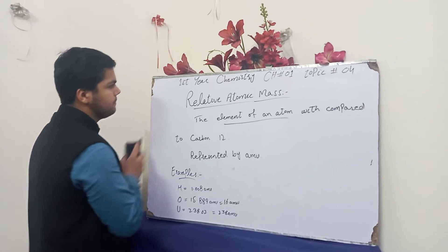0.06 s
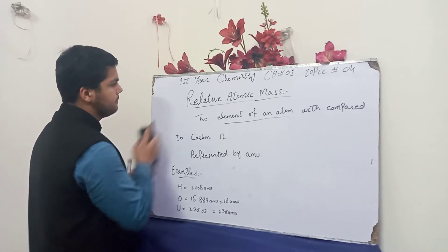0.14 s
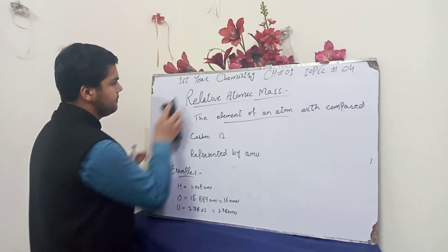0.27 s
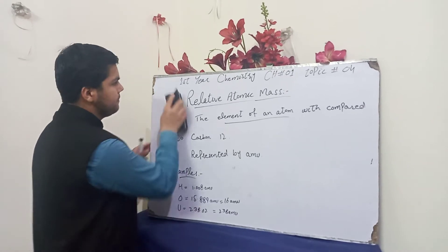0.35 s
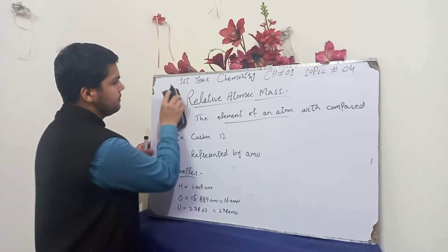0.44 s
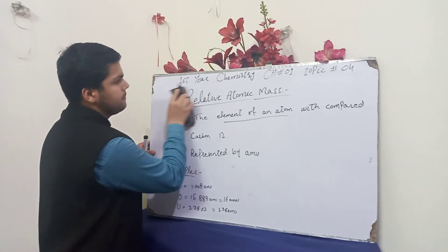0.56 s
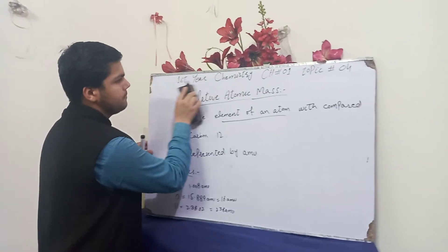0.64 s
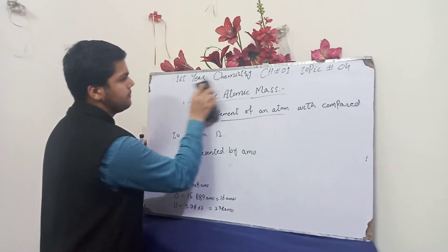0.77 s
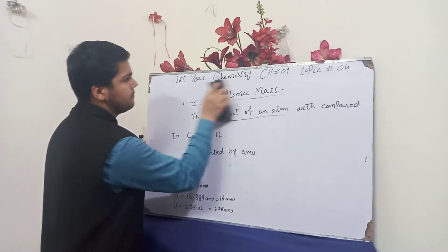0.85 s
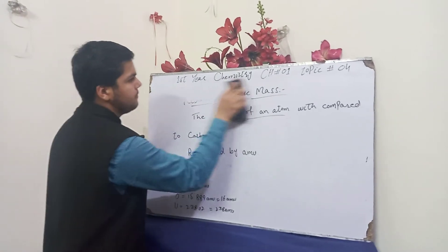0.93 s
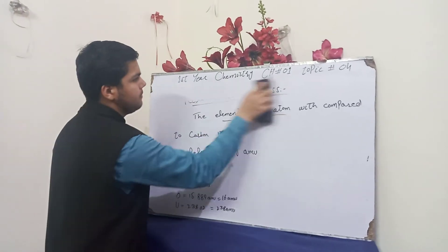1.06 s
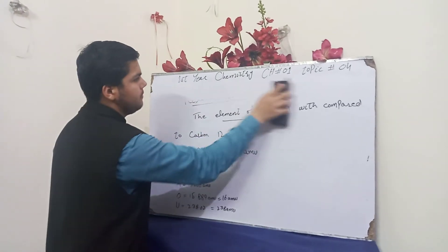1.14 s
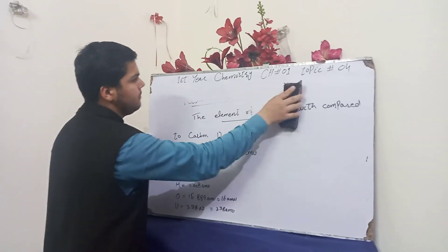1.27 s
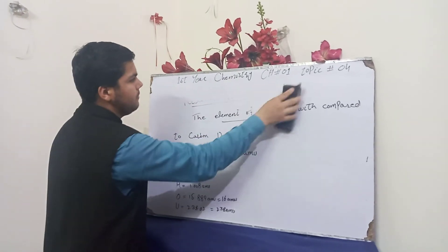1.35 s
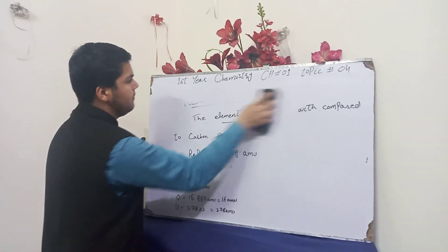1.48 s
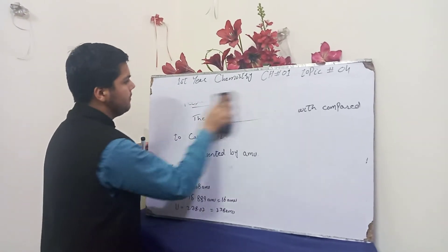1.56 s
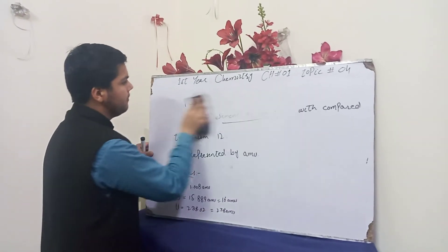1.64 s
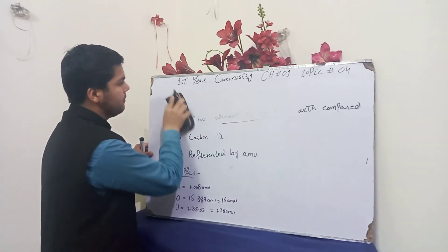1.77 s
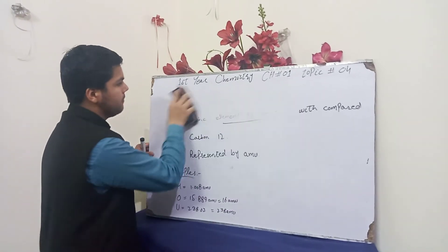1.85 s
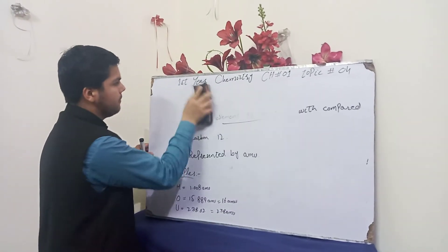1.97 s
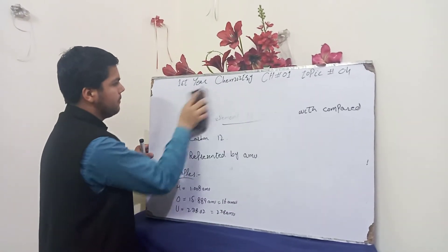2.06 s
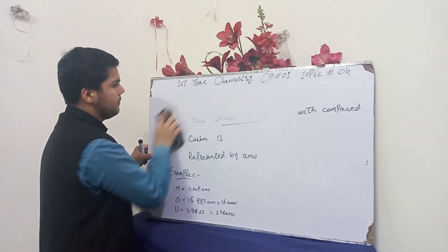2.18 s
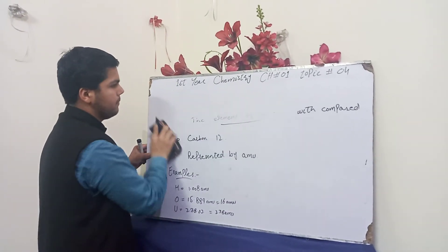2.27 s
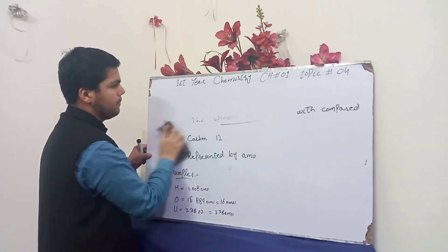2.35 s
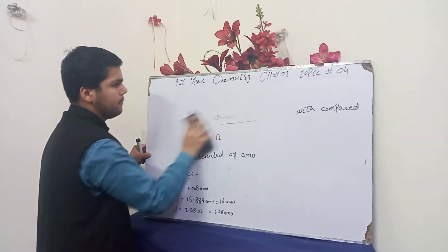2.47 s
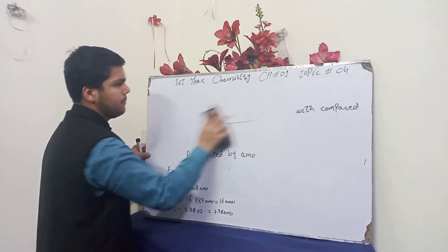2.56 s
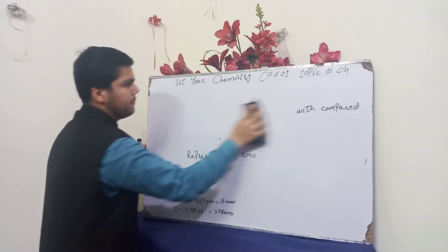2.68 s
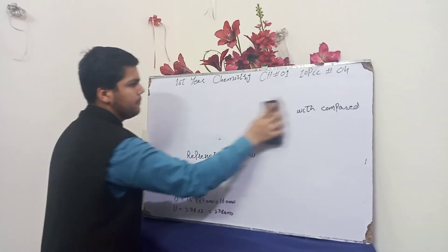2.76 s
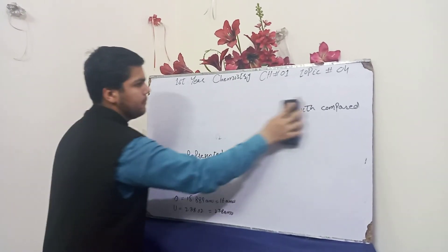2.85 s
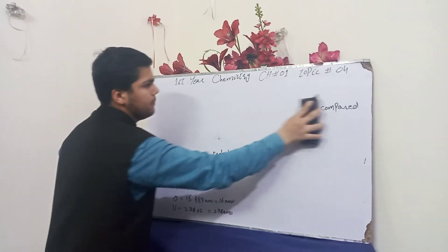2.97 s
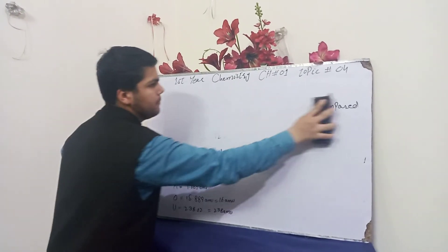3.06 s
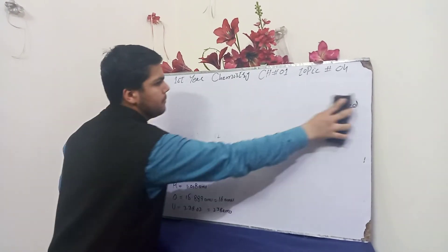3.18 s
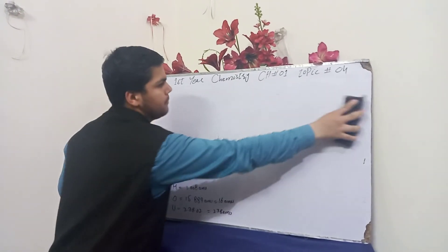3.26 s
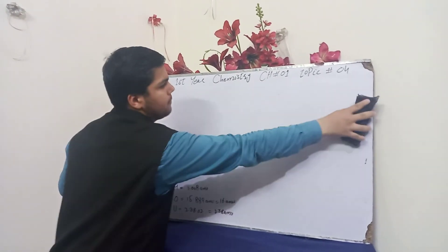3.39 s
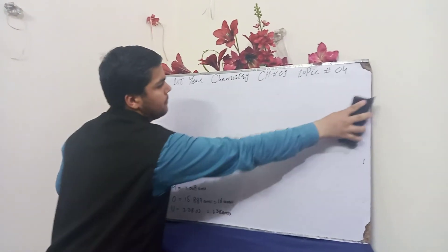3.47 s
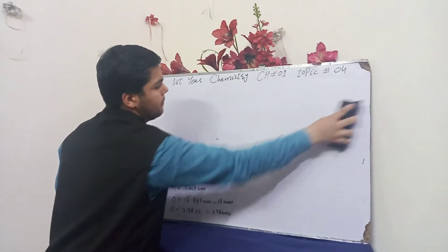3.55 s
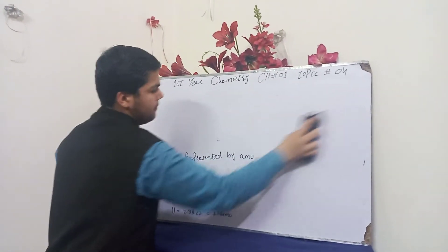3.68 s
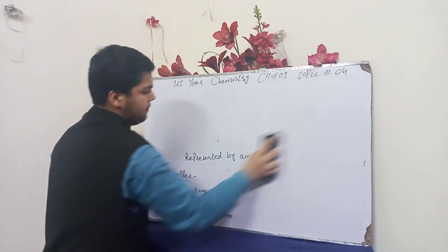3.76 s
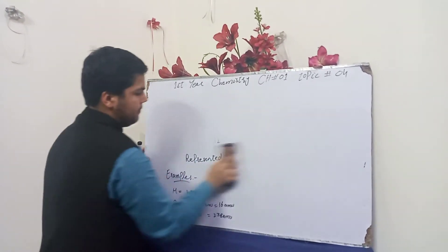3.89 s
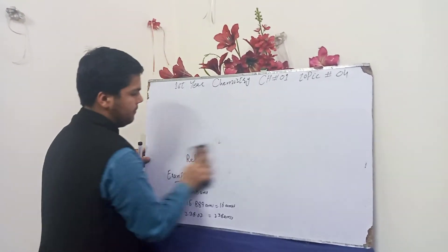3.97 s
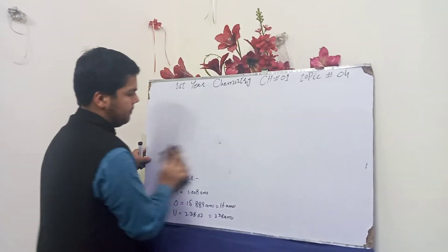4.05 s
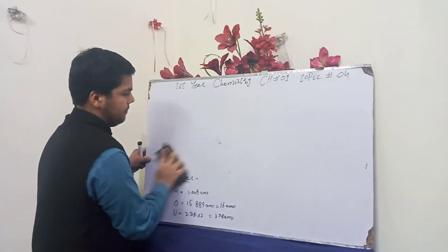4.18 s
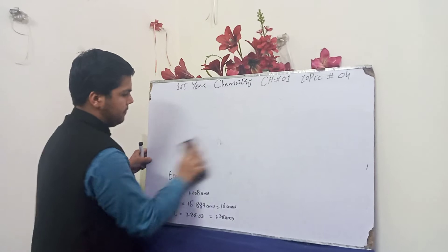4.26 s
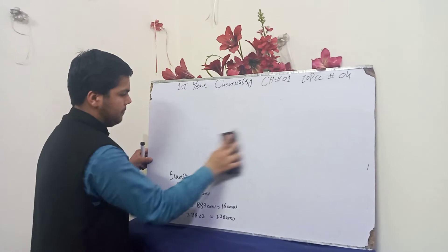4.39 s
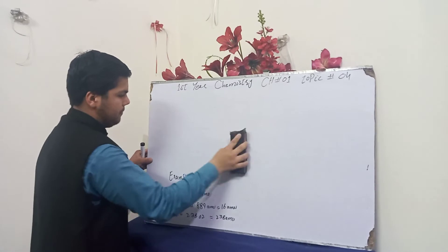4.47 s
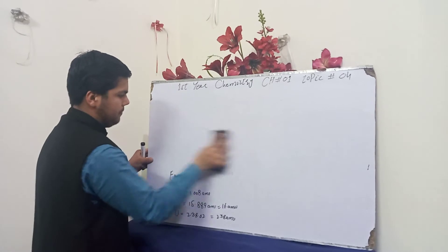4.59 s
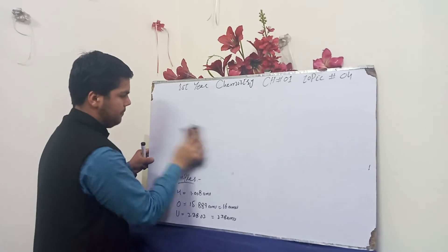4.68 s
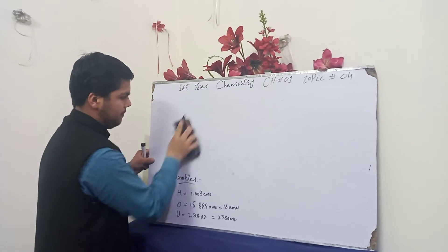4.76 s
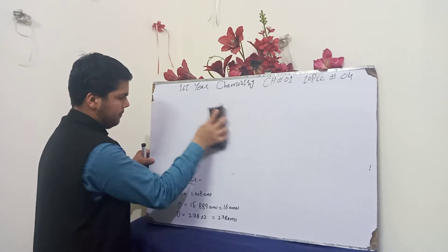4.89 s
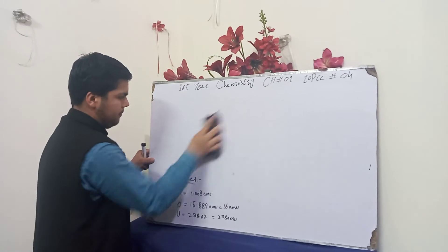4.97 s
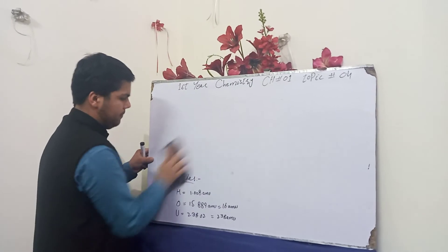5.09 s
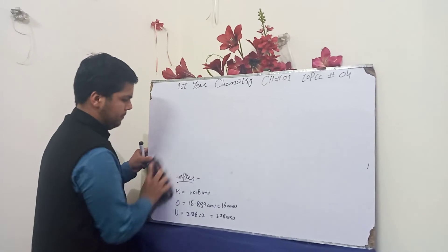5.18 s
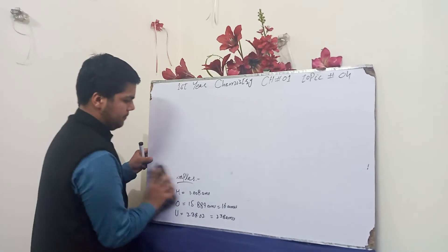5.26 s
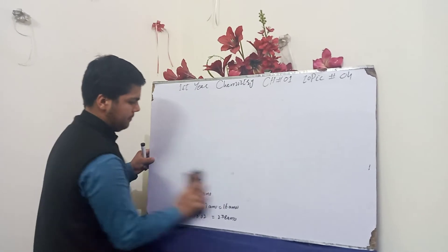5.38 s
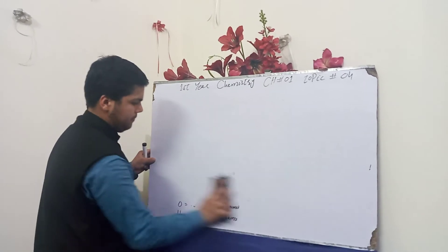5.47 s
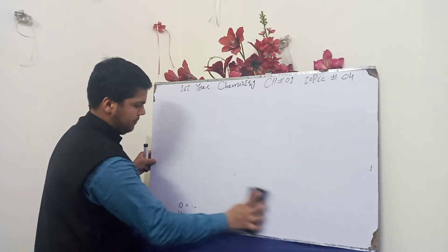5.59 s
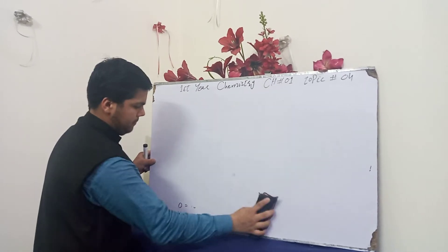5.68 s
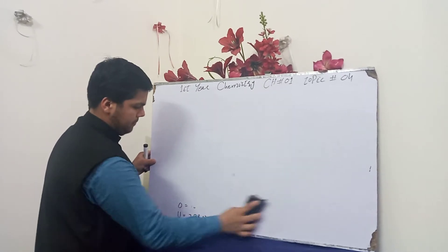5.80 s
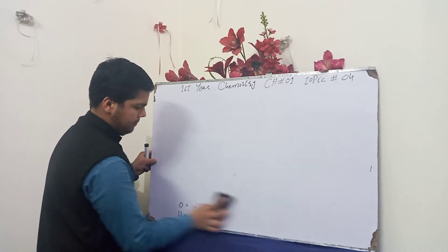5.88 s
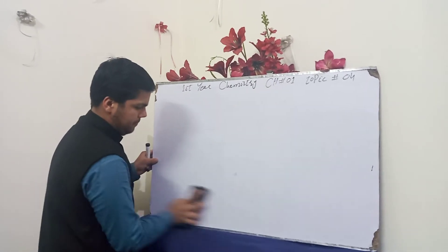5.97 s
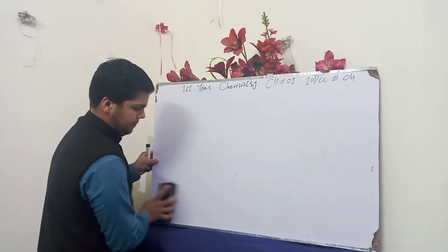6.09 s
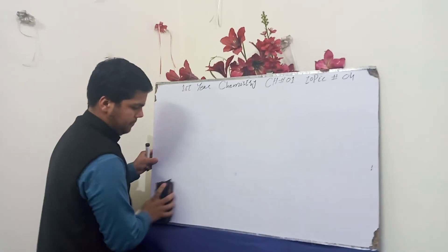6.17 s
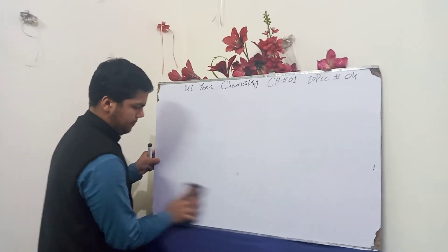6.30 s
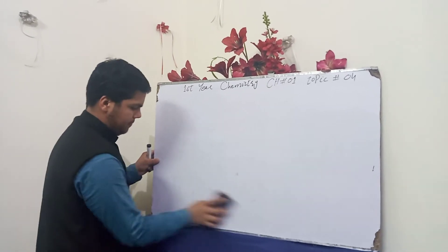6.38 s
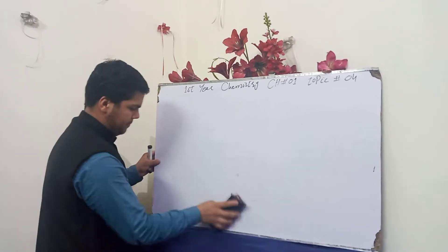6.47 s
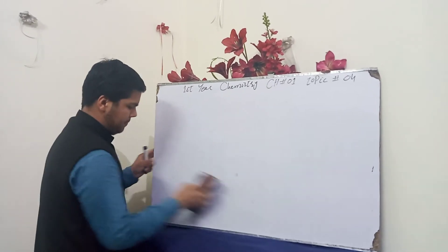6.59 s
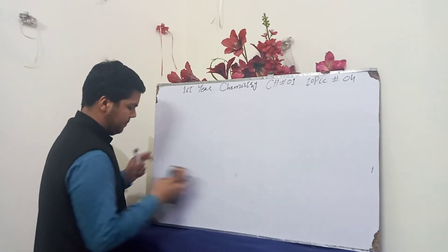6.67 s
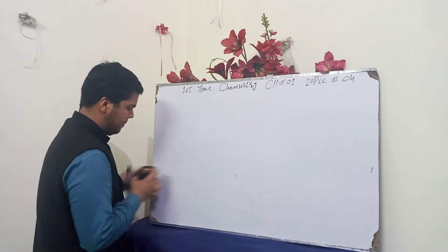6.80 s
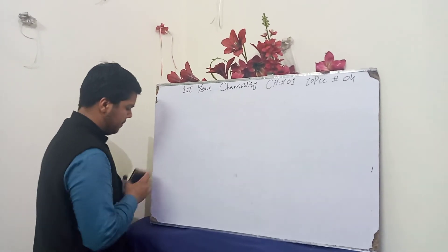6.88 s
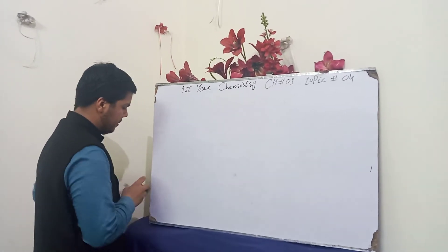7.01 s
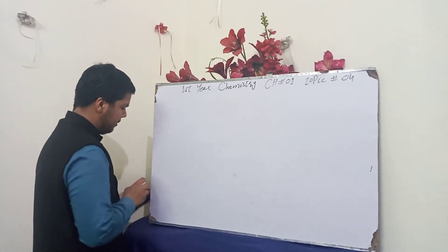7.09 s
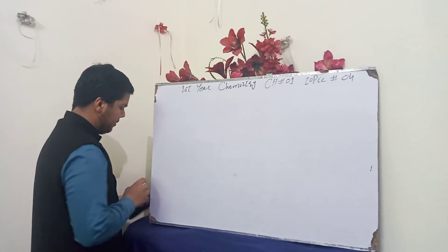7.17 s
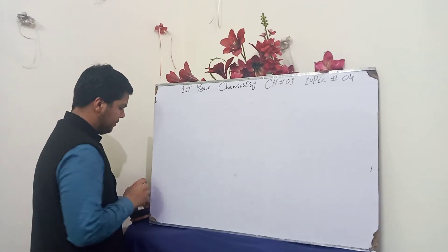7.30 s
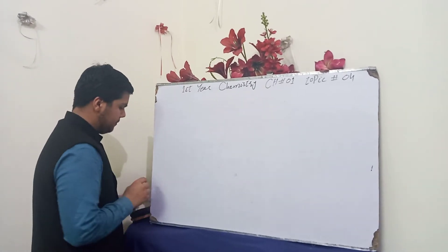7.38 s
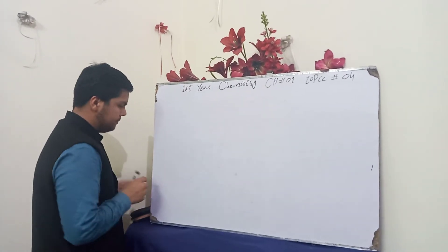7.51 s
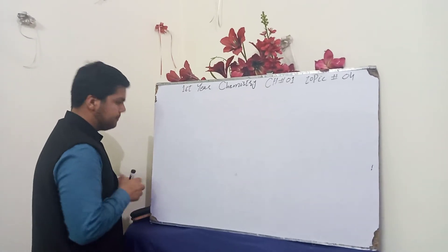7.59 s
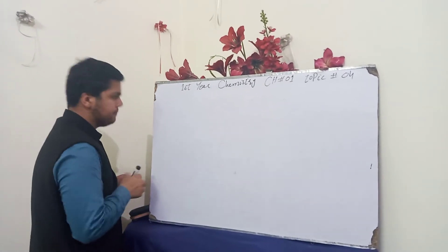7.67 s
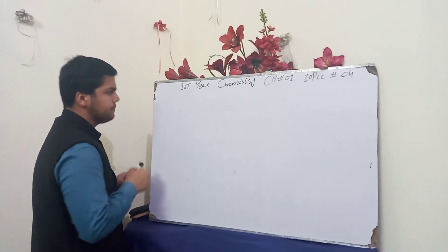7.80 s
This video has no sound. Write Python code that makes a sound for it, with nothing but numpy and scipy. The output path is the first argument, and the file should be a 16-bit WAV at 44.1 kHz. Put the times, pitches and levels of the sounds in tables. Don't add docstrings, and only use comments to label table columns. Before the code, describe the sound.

In a small bare room with a faint low rumble, sleeves rustle briefly, then a felt eraser swishes to and fro across a thin whiteboard for about six seconds, catching at some turns while the board softly bumps the wall. The wiping stops, cloth and fingers rustle, the eraser lands on a table with a short muffled boom, and a small sharp tick ends it. Close stereo microphones.

```python
import sys
import numpy as np
from scipy import signal
from scipy.fft import rfft, irfft, next_fast_len
from scipy.io import wavfile
from scipy.ndimage import uniform_filter1d, map_coordinates

SR = 44100
rng = np.random.default_rng(int(sys.argv[2]) if len(sys.argv) > 2 else 0)


def volts(x):
    e = np.asarray(x, float) / 20
    return 10 ** e


def unload_wav(signal):
    wavfile.write(
        sys.argv[1],
        SR,
        np.round(np.clip(np.atleast_2d(signal).T, -1, 1) * 32767).astype(np.int16),
    )


N = 345811

# pitch_hz, level_db (per Hz)
FELT = [(1350, -50.5), (2300, -11), (2700, -4), (3220, -1), (3690, -1.5), (5420, -3), (6500, 1.5),
        (8070, -9), (9000, -13), (11700, -34), (19800, -120)]
# pitch_hz, level_db (per Hz)
DUST = [(6000, -19), (8000, -20), (9500, -2), (13900, -9), (14500, 0.5), (15700, 2)]


def unit(x):
    return x / np.sqrt(np.mean(x ** 2) + 1e-20)


def along(points, hz):
    f, v = np.transpose(points)
    return np.interp(np.log(hz + 1), np.log(f + 1), v)


def curves(rows):
    s, *cols = np.transpose(rows)
    return [np.interp(np.arange(N) / SR, s, c) for c in cols]


def wobble(rate):
    knots = rng.standard_normal(int(N * rate / SR) + 4)
    return map_coordinates(knots, [np.arange(N) * rate / SR])


def ramps(events):
    t = np.arange(N) / SR
    power = 0
    for s, db, up, hold, down in events:
        before, after = np.clip(s - t, 0, None), np.clip(t - s - hold, 0, None)
        power = power + volts(db - up * before - down * after) ** 2
    return 10 * np.log10(power + 1e-14)


def filtered(x, response):
    m = next_fast_len(N + SR // 2)
    return irfft(rfft(x, m) * response(np.fft.rfftfreq(m, 1 / SR)), m)[..., :N]


def coloured(x, spectrum):
    return unit(filtered(x, lambda hz: volts(along(spectrum, hz))))


def resonance(hz, centre, width):
    return 1j * hz * width / (centre * centre - hz * hz + 1j * hz * width)


def resonant(x, modes):
    def ring(hz):
        return sum((-1) ** k * volts(db / 2) * resonance(hz, c, w) for k, (c, w, db) in enumerate(modes))
    return unit(filtered(x, lambda hz: ring(hz) ** 2))


def fibres(grit_db, clump_db, patchy_db):
    sizes = grit_db * rng.standard_normal(N) + clump_db * (wobble(180) + wobble(25))
    z = signal.stft(rng.standard_normal((3, N)), nperseg=1024)[2]
    field = uniform_filter1d(rng.standard_normal(z.shape), size=3, axis=1)
    field = uniform_filter1d(field, size=6, axis=2)
    slips = signal.istft(z * volts(patchy_db * unit(field)), nperseg=1024)[1][:, :N]
    slips[0] *= unit(volts(sizes))
    return slips


def reach_ms():
    # time_s, left_lag_ms (how much later the left microphone hears it)
    swing_ends = [(.3, 1.02), (.7, 1.005), (1.23, .83), (1.72, 1.005), (2.1, 1.02), (3.25, .797),
                  (3.4, .797), (4.12, 1.04), (4.4, .94), (4.68, 1.01), (4.87, .965), (5.18, 1.04),
                  (5.63, .915), (6.05, 1.025), (6.4, .96), (6.9, 1.07)]
    s, ms = np.transpose(swing_ends)
    place = np.interp(np.arange(N) / SR, s, np.arange(len(s)))
    eased = np.floor(place) + (1 - np.cos(np.pi * (place % 1))) / 2
    return np.interp(eased, np.arange(len(s)), ms)


def delayed(x):
    left = map_coordinates(x, [np.arange(N) - reach_ms() * SR / 1000], mode="nearest")
    return np.array([left, x])


def spread(tone, level_db, wet_db, t60):
    keep = volts(-120 / (t60 * SR))
    lingering = np.sqrt(signal.lfilter([1 - keep], [1, -keep], volts(level_db) ** 2))
    direct = delayed(volts(level_db) * tone[0])
    return (direct + volts(wet_db) * lingering * tone[1:]) / np.hypot(1, volts(wet_db))


def background(rubbing):
    # pitch_hz, level_db (per Hz)
    hum = [(15, -47), (25, -28.5), (91, -3.5), (134, 1.5), (160, -8.5), (199, -3), (387, -15), (405, -15),
           (800, -29), (1040, -28), (1760, -120)]
    # pitch_hz, level_db (per Hz)
    hiss = [(250, -8.5), (500, -7), (1000, -12.5), (1400, -11), (7100, -10.5), (9000, -13.5), (12300, -31),
            (14000, -28), (15000, -11)]
    lumps_db = 2.2 * wobble(7) + 2.2 * wobble(16)
    rumble = unit(volts(lumps_db) * coloured(rng.standard_normal((3, N)), hum))
    rumble = volts(-69) * (delayed(rumble[0]) + volts(-6) * rumble[1:])
    loudness = np.sqrt(np.abs(uniform_filter1d(rubbing ** 2, size=4000)))
    ducking = 1 / (1 + loudness / volts(-36.5))
    patches = fibres(grit_db=0, clump_db=0, patchy_db=3.0)[1:]
    return rumble + volts(-67) * ducking * coloured(patches, hiss)


def rustle_db(column):
    # time_s, level_db, slope_s (per 10 dB), dull_db, fine_db (both re level)
    rustles = [(0.0, -59.5, .16, -11, -14), (.13, -54.5, .05, -14, -16), (.2, -63, .08, -10, -20),
               (.27, -53, .06, -12, -9), (.345, -51, .04, -8, -12), (.44, -61, .05, -7, -20),
               (.31, -56, .04, -8, -12), (6.48, -57, .12, -20, -12), (6.57, -61.5, .08, -28, -14),
               (6.67, -59, .04, -22, -9), (6.9, -51, .028, -11, -16), (7.01, -60.5, .07, -6, -25),
               (7.11, -65.5, .1, -13, -20), (7.175, -64, .03, -19, -16), (7.29, -59, .04, -14, -7),
               (7.335, -61, .01, -14, -12), (7.475, -76, .04, 4, -8), (7.57, -76, .04, -15, 6)]
    # time_s, level_db, fading_s (per 10 dB), dull_db, fine_db (both re level)
    touches = [(6.634, -55.5, .035, -30, -8), (6.737, -55, .14, -15, -8), (6.857, -46, .022, -30, -5),
               (7.234, -54.5, .045, -18, -8), (7.678, -66, .016, -20, 6)]
    rise_s = .012
    swells = [(row[0], row[1] + column(row), 10 / row[2], 0, 10 / row[2]) for row in rustles]
    contacts = [(row[0], row[1] + column(row), 10 / rise_s, 0, 10 / row[2]) for row in touches]
    return ramps(swells + contacts)


def sleeves():
    # pitch_hz, level_db (per Hz)
    cloth = [(1470, -43), (2500, -9.5), (3080, -8.5), (3580, -3), (6630, -1), (9000, -10.5), (11700, -34),
             (19800, -120)]
    level_db = rustle_db(lambda row: 0)
    dull_db = rustle_db(lambda row: row[3]) - level_db
    fine_db = rustle_db(lambda row: row[4]) - level_db
    slips = fibres(grit_db=2.0, clump_db=1.6, patchy_db=3)
    tone = coloured(slips, cloth) + volts(fine_db + 3) * coloured(slips, DUST)
    tone += volts(dull_db - 3.0) * resonant(slips, [(1005, 110, -0.5), (1450, 270, -3), (2050, 500, 1.5)])
    return spread(tone, level_db + 2.5, wet_db=1.5, t60=.12)


def strokes():
    # time_s, speed_db (as felt hiss), flat_db (felt flatness as skin re hiss)
    sweep = [(.52, -45.5, -13), (.8, -41, -13), (1.08, -38, -12.5), (1.36, -40.5, -9.5),
             (1.57, -36.5, -7.5), (1.85, -40, -11.5), (2.12, -41.5, -10.5), (2.6, -36.5, -12.5),
             (3.0, -38, -8.5), (3.5, -40.5, -12), (3.97, -36.8, -7), (4.3, -37, -12.5), (4.6, -37.5, -8.5),
             (5.2, -38.5, -11.5), (5.42, -33.3, -5.5), (5.77, -43, -11), (6.02, -40, -10.5),
             (6.3, -40.8, -9)]
    # time_s, dip_db, slowing_s, pick_up_s, catch_db
    turns = [(1.23, 12.5, .055, .05, 0), (1.745, 4, .06, .02, 6.5), (1.935, 5.5, .035, .025, 1),
             (2.215, 5.5, .018, .015, 1), (3.35, 13.5, .05, .07, 0), (3.415, 5, .03, .04, 0),
             (4.08, 8, .035, .015, 4), (4.418, 10, .025, .06, 10), (4.655, 5.5, .025, .012, 3.5),
             (4.855, 4.5, .04, .1, 5), (5.165, 6, .03, .03, 0), (5.63, 9.5, .05, .045, 0),
             (5.86, 0.5, .02, .03, 2.5), (6.1, 9, .025, .035, 0)]
    # time_s, board_db (re felt), hold_s, easing_db_per_s
    presses = [(.42, -19, .08, 250), (1.2, -23, .05, 100), (1.31, -16, .08, 50), (1.5, -14, .33, 130),
               (1.95, -21, .02, 100), (2.26, -15, .03, 130), (2.55, -34, .2, 80), (3.5, -21, .1, 65),
               (4.12, -14, .02, 140), (4.47, -22, .02, 120), (4.69, -21, .1, 60), (4.88, -16, .06, 90),
               (5.22, -19, .03, 90), (5.42, -27, .1, 120), (5.7, -19, .01, 120), (5.92, -13, .01, 170),
               (6.19, -17, .03, 90), (6.4, -24, .05, 100)]
    touch_s, settle_s, lift_s, lift_db_per_s = .36, .04, 6.33, 125
    catch_after_s, catch_s = .04, .015
    lean_db_per_s, light_db = 350, -42
    t = np.arange(N) / SR

    slowing = lift_db_per_s * np.clip(t - lift_s, 0, None)
    catches = 0
    for s, dip_db, slow, fast, catch_db in turns:
        slowing += dip_db * np.exp(-np.abs(t - s) / np.where(t < s, slow, fast))
        catches = catches + catch_db * np.exp(-((t - s - catch_after_s) / catch_s) ** 2)
    speed_db, flat_db = curves([(touch_s, -84, -11), (touch_s + settle_s, -57, -11)] + sweep)
    felt_db = speed_db - slowing + catches
    panel_db = flat_db - .4 * slowing - .5 * catches + wobble(14)

    leans = [(s, db, lean_db_per_s, hold, ease) for s, db, hold, ease in presses]
    board_db = ramps([(0, light_db, 0, 0, 0)] + leans) - catches + 2.2 * wobble(25)

    reach = reach_ms()
    returning = np.clip(uniform_filter1d(np.gradient(reach) * SR, size=4000) / .35, 0, 1)
    dust_db = -8.7 + 25 * (reach - 1) + 5 * returning * (1.05 - reach) / .2
    dust_db = dust_db - .7 * slowing + 1.3 * wobble(14)
    return felt_db, panel_db, board_db, dust_db


def eraser():
    # pitch_hz, width_hz, level_db
    panel = [(1570, 547, -2), (2124, 790, 3)]
    # pitch_hz, width_hz, level_db
    board = [(919, 109, 3.5), (1163, 750, -3)]
    # pitch_hz, width_hz, level_db
    sag = [(817, 108, 0)]
    felt_db, panel_db, board_db, dust_db = strokes()
    slips = fibres(grit_db=1.84, clump_db=1.04, patchy_db=2.5)
    absorbed = volts([[0], [-3], [-3]])
    tone = coloured(slips, FELT) + volts(dust_db + 3.7) * coloured(absorbed * slips, DUST)
    tone += volts(panel_db - 1.4) * resonant(slips, panel)
    tone += volts(board_db - 1.5) * resonant(slips, board)
    tone -= volts(1.55 * board_db - 4.5) * resonant(slips, sag)
    return spread(tone, felt_db + 2.0, wet_db=0.55, t60=0.093)


def bumps():
    # time_s, peak_db, pitch_hz, t60_s
    thuds = [(0.366, -47.5, 91.5, 0.12), (0.702, -56, 138.6, 0.17), (1.736, -43, 146, 0.091),
             (2.3, -65, 127, 0.072), (3.167, -54.5, 133, 0.087), (3.787, -55, 130, 0.11),
             (4.407, -55, 134, 0.13), (4.804, -63, 96.9, 0.12), (5.342, -58, 103, 0.12),
             (5.588, -62, 123, 0.23), (6.455, -63, 330, 0.15), (6.745, -56, 130, 0.11),
             (7.09, -57, 130, 0.12), (7.152, -51, 127, 0.1), (7.519, -50.5, 107, 0.086),
             (7.686, -54.5, 124, 0.11)]
    out, t = np.zeros(N + SR), np.arange(SR // 3) / SR
    for s, db, hz, t60 in thuds:
        swell = volts(db + 8.5 - 60 * t / t60) * (1 - np.exp(-t / 0.011))
        out[round(s * SR):][:len(t)] += swell * np.sin(2 * np.pi * hz * t)
    return out[:N]


def scuffs():
    # time_s, peak_db, knock_db (hollow),
    # fine_db (both re peak)
    snags = [(1.3009, -24.5, -32, -15), (1.3064, -28, -28, -14), (1.3185, -27, -28, -16),
             (1.7894, -25, -18.5, -21), (2.2686, -30, -14, -17), (4.1071, -22, -17, -17),
             (4.1187, -28, -20, -20), (4.1324, -25, -15, -24), (4.207, -28.5, -17, -20),
             (4.441, -33, -20, -17), (4.457, -35, -22, -17), (4.6778, -24, -18, -18),
             (4.6964, -22, -25, -21), (5.1217, -33, -24, -21), (5.2004, -25.5, -20, -19),
             (5.2144, -27, -29, -28), (5.2593, -26, -32, -20), (5.9189, -23, -20, -18),
             (6.136, -28, -23, -11), (6.7361, -41, -2, -11), (6.8565, -47, -25, -12),
             (7.2325, -41, -25, -4), (7.8344, -20.5, -17, -10), (7.8374, -19.5, -8, -12)]
    # pitch_hz, width_hz, level_db
    gap = [(500, 140, 2), (920, 510, -1.5)]
    blows, t = np.zeros((3, N + SR)), np.arange(SR // 8) / SR
    snap = volts(-60 * t / .003)
    for s, db, knock_db, fine_db in snags:
        knock = volts(knock_db - 60 * t / 0.16) * (1 - np.exp(-t / 0.008))
        shapes = [snap, volts(fine_db) * snap, knock]
        signs = np.sign(rng.standard_normal((3, len(t))))
        blows[:, round(s * SR):][:, :len(t)] += volts(db) * signs * shapes

    def coarse(hz):
        return volts(along(FELT, hz) + 6) + volts(3) / (1 + (1200 / (hz + 1)) ** 6 + (hz / 2500) ** 4)

    def fine(hz):
        return volts(along(DUST, hz) + 11)

    def hollow(hz):
        return sum(volts(db) * resonance(hz, c, w) for c, w, db in gap) ** 2

    rough, dusty, knocking = blows[:, :N]
    return filtered(rough, coarse) + filtered(dusty, fine) + volts(-0.5) * filtered(knocking, hollow)


def table():
    # pitch_hz, level_db
    top_modes = [(108, -5.5), (161, -5.5), (222, -1), (269, -1.5), (312, -13), (350, -8.5), (416, -10)]
    # time_s, boom_db, fading_db_per_s
    landings = [
        (7.243, -30, 170),
        (7.335, -46, 30),
        (7.41, -65, 100),
    ]
    t = np.arange(N) / SR
    land_db_per_s, damped_s, damp_db_per_s = 1500, 7.382, 900
    first, rock, settle = [(s, db, land_db_per_s, 0, fade) for s, db, fade in landings]
    damping_db = damp_db_per_s * np.clip(t - damped_s, 0, None)
    boom_db = np.maximum(ramps([first, rock]) - damping_db, ramps([settle]))
    slap_db = -21 - 90 * np.clip(t - 7.3, 0, .1)
    since = np.clip(t - 7.27, -.04, .2)
    boom = 0
    for hz, db in top_modes:
        mode_db = db - 0.51 * hz * since + 3.2 * wobble(30)
        cycles = hz * t + rng.random() + 0.19 * wobble(20)
        boom = boom + volts(mode_db) * np.sin(2 * np.pi * cycles)
    steady = boom / np.sqrt(np.abs(uniform_filter1d(boom ** 2, size=2200)) + 1e-9)
    slap = resonant(rng.standard_normal(N), [(503, 67, 5), (890, 350, -12)])
    return volts(boom_db - 3.0) * (steady + volts(slap_db - 1) * slap)


def paths(x, wet_db, size):
    # pitch_hz, t60_s
    walls = [(200, 0.35), (2000, 0.13), (10000, 0.067)]
    pieces = np.pad(x, (0, -N % size)).reshape(-1, 1, size)
    hz, t, z = signal.stft(rng.standard_normal((len(pieces), 2, SR // 7)), SR, nperseg=256)
    tails = signal.istft(z * volts(-60 * t / along(walls, hz)[:, None]), SR, nperseg=256)[1]
    tails = tails / np.sqrt(np.mean(np.sum(tails ** 2, axis=2)))
    echoes = signal.fftconvolve(pieces, tails, axes=2)
    wet = np.zeros((2, N + 2 * SR))
    for k, echo in enumerate(echoes):
        wet[:, k * size + 130:][:, :echo.shape[1]] += echo
    return delayed(x) + volts(wet_db) * wet[:, :N]


def scene():
    rubbing = eraser()
    thuds = paths(bumps() + table(), wet_db=-13.5, size=40000)
    catches = paths(scuffs(), wet_db=-3.5, size=12000)
    return background(rubbing) + sleeves() + rubbing + thuds + catches


def low_pass(x):
    return signal.sosfilt(signal.butter(12, 17100, fs=SR, output="sos"), x)


def record(dry):
    # pitch_hz, level_db (left over right)
    port_tilt = [(60, 3), (300, 4.5), (700, 2.5), (1500, 6.5), (4500, 5.5), (7200, 7), (8300, -2),
                 (15000, -1.5)]

    def colour(hz):
        return volts(np.outer([.5, -.5], along(port_tilt, hz))) * (hz < 15800)

    return low_pass(filtered(dry, colour))


dry = scene()
out = record(dry)
unload_wav(out)
```